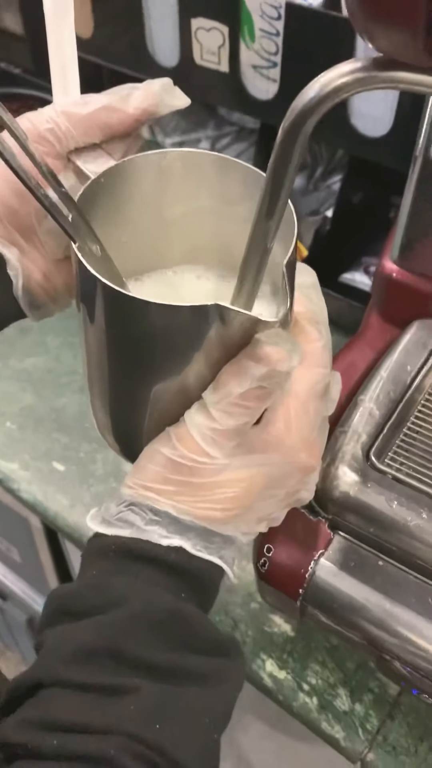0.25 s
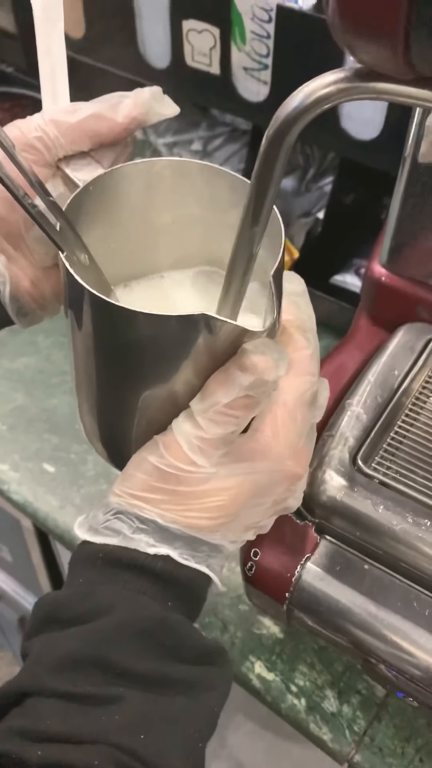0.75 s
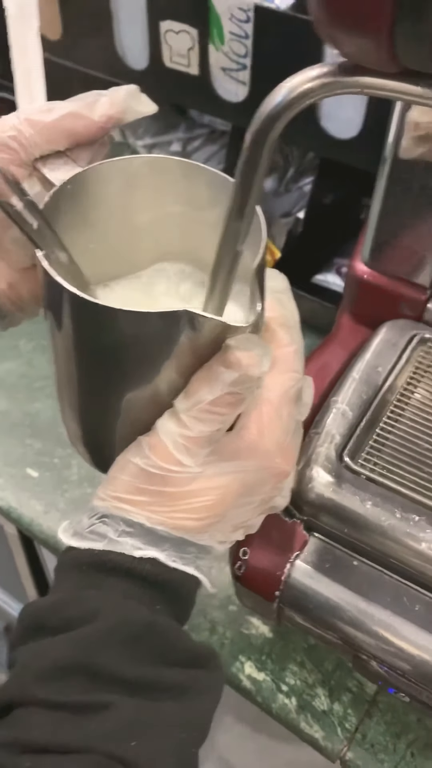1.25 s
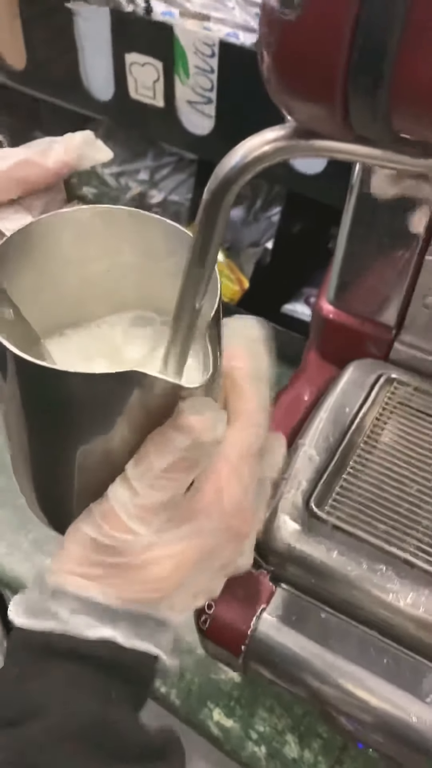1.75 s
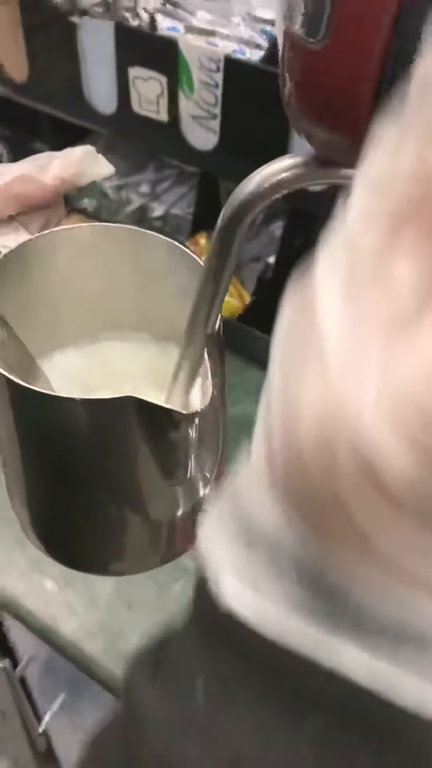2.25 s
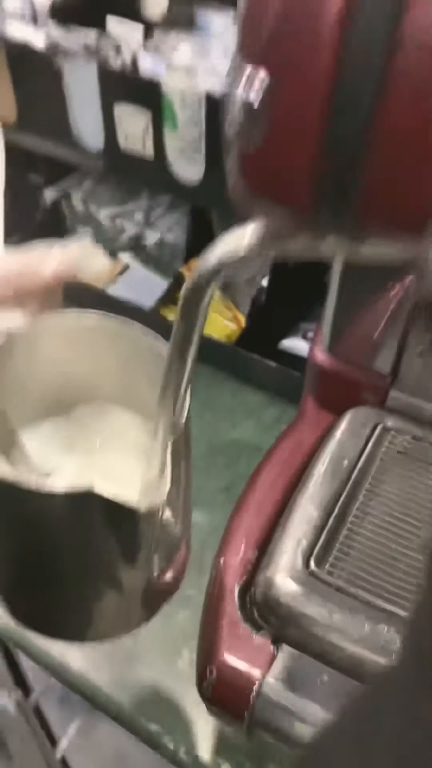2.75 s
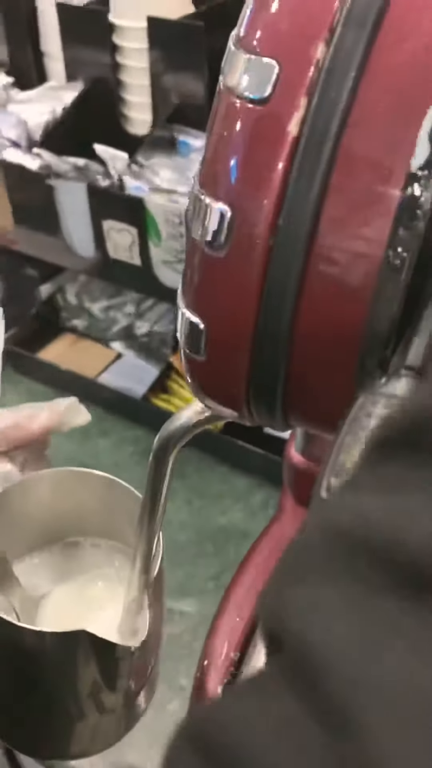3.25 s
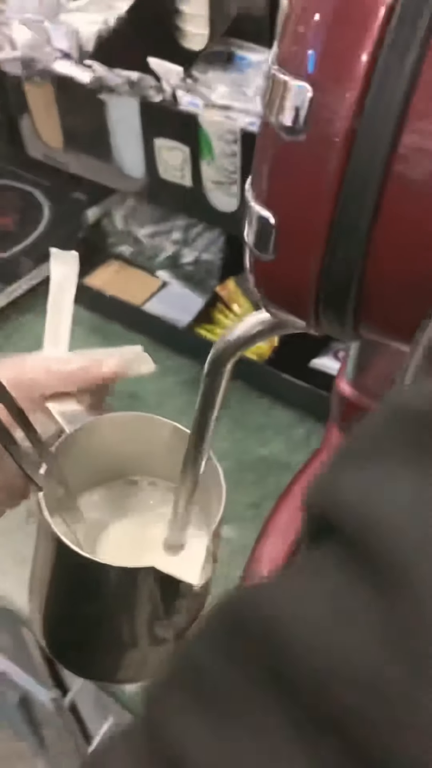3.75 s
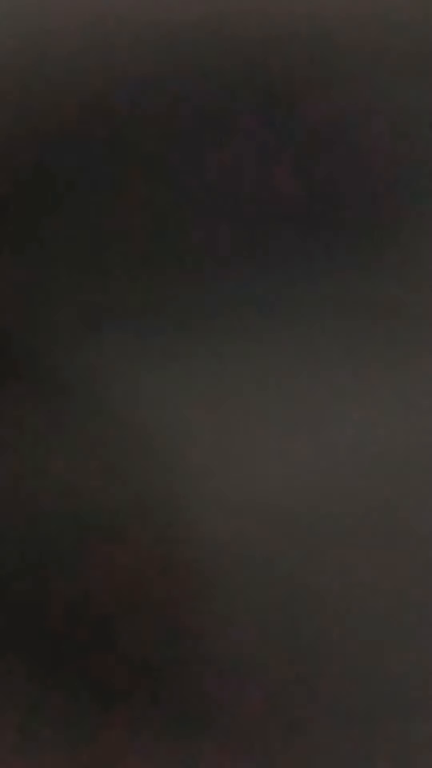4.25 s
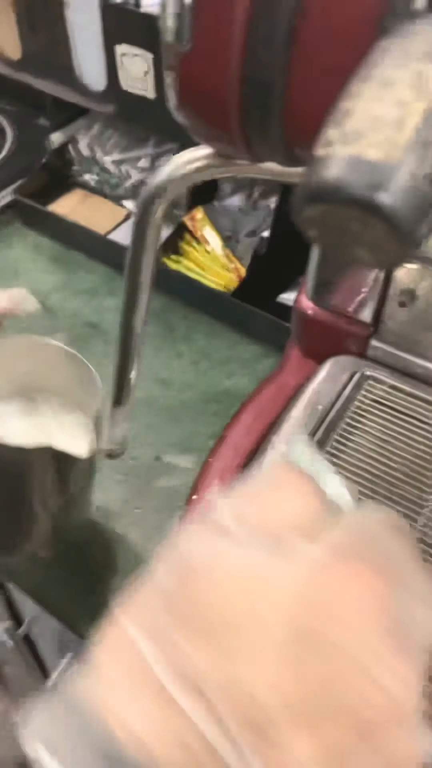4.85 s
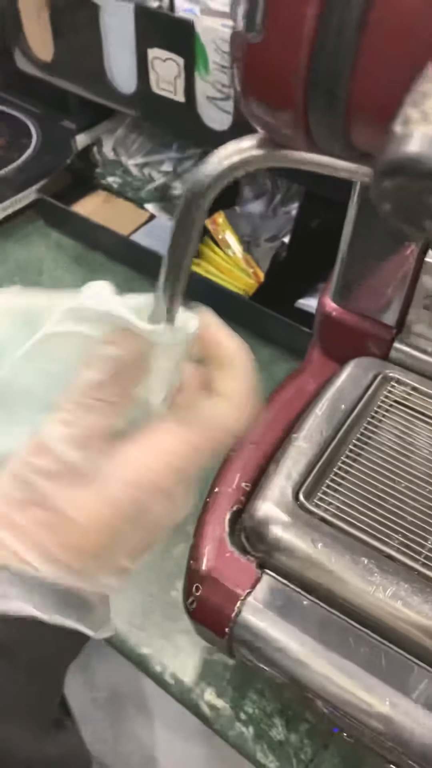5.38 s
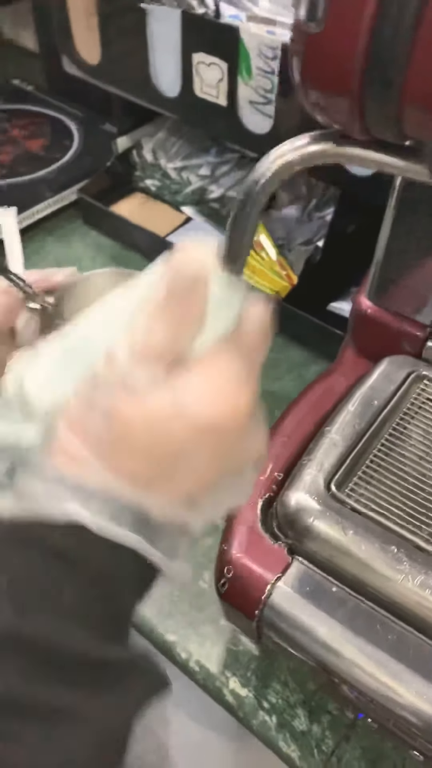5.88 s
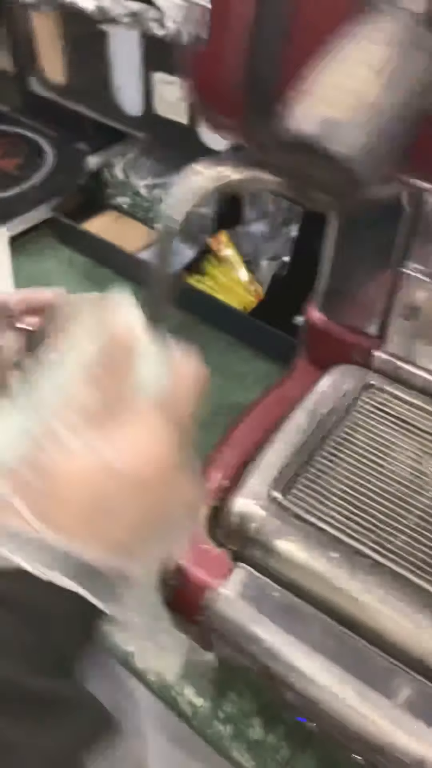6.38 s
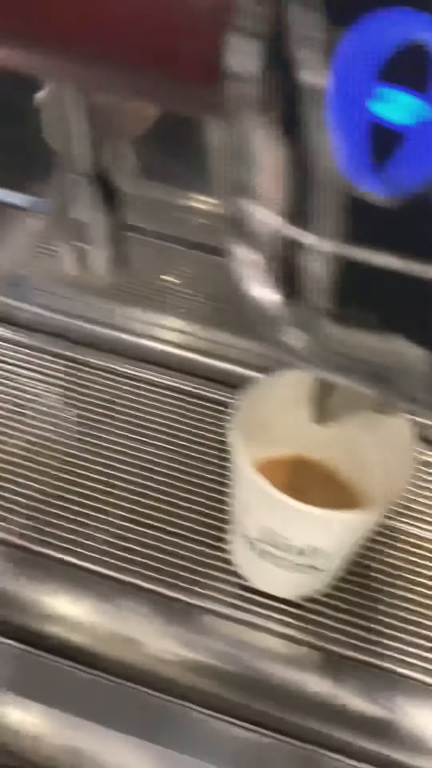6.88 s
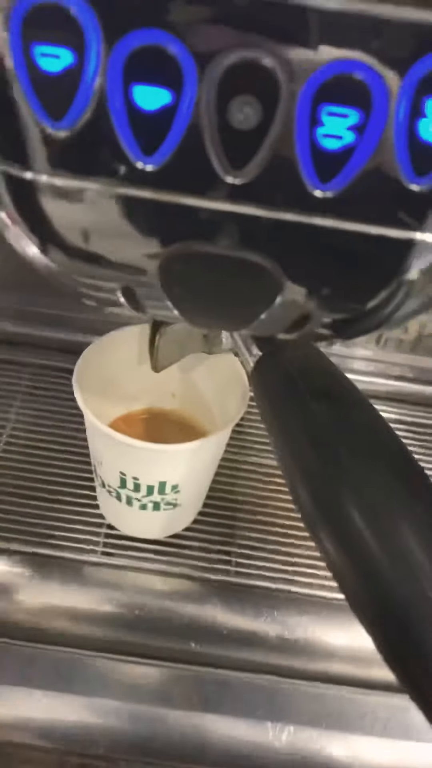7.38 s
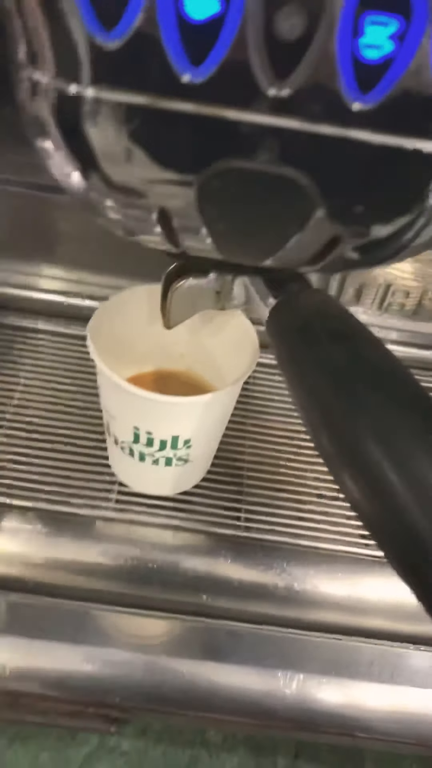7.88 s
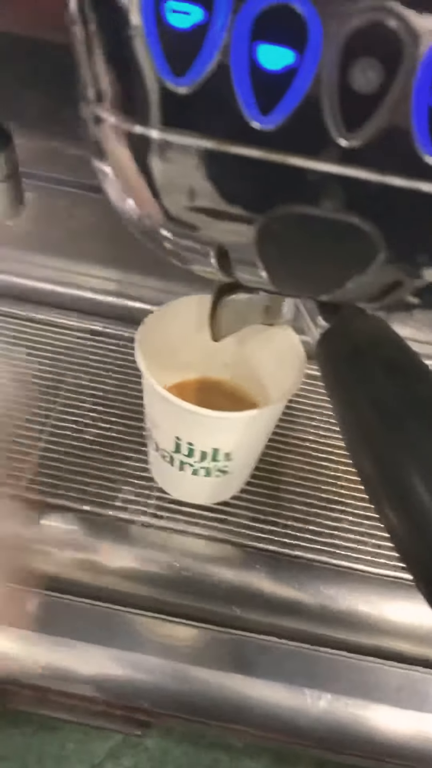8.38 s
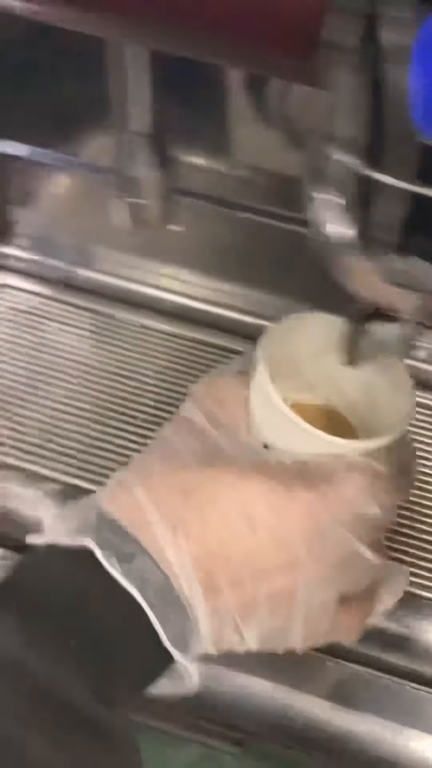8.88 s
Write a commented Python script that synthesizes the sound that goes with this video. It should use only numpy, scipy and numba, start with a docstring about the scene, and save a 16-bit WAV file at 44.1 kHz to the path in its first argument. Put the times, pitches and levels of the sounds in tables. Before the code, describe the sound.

A bubbling milk-steaming roar stops near three seconds; motor whine and fridge hum remain, then firm pitcher knocks, rattles, clacks and a brief steam vent.

```python
"""A steam jet rumbles and hisses in a steel pitcher of milk (damped sines, resonant noise), sputters and is shut off.
The pitcher then knocks on a counter (dispersed decaying modes) while its thermometer rattles (noise bursts).
Cloth rustles now and then in the second half; last come hard clacks and a valve's burst of steam (shaped noise).
Fridges, hum and a loaded motor's whine lie under it all. Two microphone ports hear the sum, and the
gain falls after loud sounds."""
import sys
import numpy as np
from scipy import signal
from scipy.fft import rfft, irfft, next_fast_len
from scipy.io import wavfile
from scipy.ndimage import uniform_filter1d
from numba import njit

SR = 44100
rng = np.random.default_rng(int(sys.argv[2]) if len(sys.argv) > 2 else 0)


def master_out(mix):
    """Clip the mix to full scale and print it as 16-bit PCM to the path in sys.argv[1]."""
    frames = np.transpose(np.atleast_2d(mix))
    ceiling = np.clip(frames, -1, 1)
    pcm = np.round(ceiling * 32767).astype(np.int16)
    wavfile.write(sys.argv[1], SR, pcm)


N = 402633
T = np.arange(N) / SR  # t/s
SIZE = next_fast_len(N + SR // 2)  # padded transform length
F = np.maximum(np.arange(SIZE // 2 + 1) * SR / SIZE, 1.)  # f/Hz

# All levels are relative, ahead of later gains.
# Shop air spectrum: [f/Hz, density level/dB]; its course: [t/s, level/dB]
AIR_SPECTRUM = [(25, -80), (45, -7.5), (70, -5.5), (150, -10.5), (300, -8.5), (600, -12), (1000, -14),
                (1600, -19), (2400, -22.5), (3500, -28.5), (5000, -36.5), (7000, -35), (10000, -39.5),
                (15500, -34.5)]
AIR_LEVEL = [(0, -43), (3, -38.5), (5, -38.5), (6.8, -40.5), (7.5, -40), (9.13, -41.5)]
# Mains hum: [t/s, level/dB]
HUM_LEVEL = [(0, -35), (1.5, -33.5), (2.5, -33), (5, -32.5), (6.5, -35), (7.2, -38), (7.9, -36),
             (9.13, -39.5)]
HUM_HZ = 119.7
# Compressor peaks, applied twice: [f/Hz, width/Hz, level per pass/dB]
COMPRESSOR_PEAKS = [(138.5, 7.2, 0.7), (278.7, 2.1, -3.5), (420, 2, -1.5), (553, 4.5, -1)]
COMPRESSOR_DB = -45.5
# Gear whine: [t/s, second partial level/dB, other partials level/dB]
WHINE_LEVEL = [(0, -50.5, -54), (.4, -48, -58), (.9, -53, -59), (1.3, -53.5, -57), (2.4, -52, -60),
               (2.9, -61.5, -62), (3.5, -56, -56), (4.0, -56, -55), (4.32, -47, -60), (4.8, -56, -53),
               (4.95, -47.5, -54.5), (5.15, -46.5, -63), (5.55, -52, -63), (5.9, -43, -59),
               (6.15, -52, -49), (6.7, -60, -62), (7.0, -47.5, -61.5), (7.5, -41.5, -60.5),
               (8.0, -43, -52.5), (8.6, -49, -60), (9.13, -48, -64)]
# Other partials: [multiple of the fundamental, level/dB, change under load/dB]
PARTIALS = [(1, -16, 0.1), (3, 3.5, -2.5), (4, 1.5, -7)]
# Swell of the second partial, one value a turn: [level/dB]
TURN_SWELLS = [6, 9.9, 19.6, 12.7, 5, 6.3]
# a geared motor meets its load once a turn: it slows, and the second partial swells
WHINE_HZ, TURN_S, LOADED_S, WHINE_FLICKER_DB = 980, 1.605, 1.58, 2.2
LOAD_RISE_S, LOAD_FALL_S, SAG_SHARE = .26, .16, .009
SWELL_EARLY_S, SWELL_LATE_S, SWELL_EDGE_S = 0.19, 0.19, 0.08

# Bright crackling hiss: steam sputters at 1.775 and 2.387 s, then gloves and cloth:
# [middle t/s, length/s, level/dB]
CRACKLE_EVENTS = [(1.775, .1, -41), (2.387, 0.29, -38), (4.745, 0.36, -53.5), (5.103, 0.17, -50),
                  (5.367, 0.32, -43.5), (5.808, 0.28, -42.5), (6.077, 0.21, -51), (6.325, 0.21, -43),
                  (6.64, 0.49, -52), (8.396, 0.89, -48), (9.05, 0.29, -48.5)]
CRACKLE_EDGE_S = 0.041
# Hard clacks: [t/s, level/dB, thud level/dB, casing ring level/dB]
CLACK_EVENTS = [(7.654, -15, -3.5, -26), (8.036, -23, -4, -27)]
# Casing modes: [f/Hz, level/dB, decay by 60 dB/s]
CASING_MODES = [(1080, -4, 0.031), (1320, -2, 0.039), (1770, 4.5, 0.018), (3370, 2, 0.0098),
                (4020, 5, 0.0043)]
THUD_HZ, THUD_CYCLES, THUD_LATE_S, THUD_RING_DB = 195.5, 5.8, 0.01825, -1.5
# The vent opens with a spurt, eases, shuts and leaks away: [t/s, flow level/dB]
VENT_FLOW = [(8.02, -80), (8.034, -28), (8.042, -2.5), (8.063, -4), (8.09, -9), (8.168, -10), (8.188, -16),
             (8.27, -26), (8.3, -36), (8.5, -80)]
# Spectrum of vented steam: [f/Hz, level/dB]
VENT_SPECTRUM = [(300, -26), (1500, -0.5), (3500, 8), (6200, 13), (8000, 7.5), (10500, 13), (13000, 11.5),
                 (14500, 15), (15800, 6.5)]
# Thermometer, lever and glove ticks: [t/s, level/dB]
TICK_EVENTS = [(1.749, -36), (1.784, -33), (1.8043, -33), (2.123, -28), (2.369, -25.5), (2.385, -29),
               (2.412, -25.5), (2.492, -33), (2.53, -28.5), (2.824, -33.5), (5.357, -32), (5.4113, -34),
               (5.458, -35), (5.7613, -18), (5.792, -39), (5.799, -32), (5.8597, -28), (5.9327, -35.5),
               (6.04, -20), (6.058, -23), (6.125, -34.5), (6.327, -19.5), (6.381, -30), (6.3934, -34),
               (6.4295, -39), (6.492, -26), (6.5218, -44), (6.563, -29), (6.593, -36), (6.601, -30),
               (6.671, -34), (6.6888, -36), (7.978, -32.5), (8.022, -28), (8.683, -49)]
# Bright spectrum of ticks, crackles and clacks: [f/Hz, level/dB]
BRIGHT_SPECTRUM = [(800, -4), (2500, 7.5), (4000, 9), (7000, 5.5), (11000, 7), (13500, 4), (15800, 3.5)]
TICK_T60_S, TICK_TAIL_DB, TICK_TAIL_T60_S = 0.018, -11.5, 0.21

# Pitcher on the counter: [t/s, level/dB, hardness/dB, boom/dB, rim crack level/dB]
BLOWS = [(5.284, 1, -2, 3, -21), (5.3031, -20, 7, 2, -16.5), (5.674, 3, -4.5, 4, -16.5),
         (5.983, 0, -6, 0, -16), (6.239, 2, -3, 3.5, -17), (6.473, -4.5, -4, -15, -31),
         (6.606, -16, -26, -1, -53)]
# Counter modes: [f/Hz, level/dB, decay by 60 dB/s]
COUNTER_MODES = [(192.8, -10, 0.53), (330, -25, 0.11), (378.3, 1.5, 0.13), (457, 7, 0.067),
                 (503.6, 4.5, 0.095), (592, -9, 0.23), (790, 8.5, 0.063), (817, -1, 0.14), (936, -12, 0.27),
                 (1334, -7, 0.066), (1425, -4.5, 0.091), (2030, -8, 0.099), (2146, -7, 0.098),
                 (2270, -25, 0.38), (3960, -13, 0.048)]
DETUNE_SHARE, DAMPING_SHARE = .012, .15
# Dull scuffs on the counter: [t/s, level/dB, decay by 60 dB/s]
SCUFF_EVENTS = [(5.132, -28, 0.069), (5.334, -35, 0.054), (6.609, -50, 0.081), (5.14, -27.5, 0.19),
                (5.505, -36, 0.058), (7.981, -36.5, 0.37), (8.198, -26, 0.084), (8.682, -33.5, 0.082),
                (8.93, -37, 0.24)]
# Small rattles of things on the counter: [t/s, level/dB, f/Hz]
RATTLE_EVENTS = [(5.329, -15, 704), (5.409, -39, 714), (5.47, -45, 500), (5.504, -30, 552),
                 (5.719, -14, 823), (5.747, -23, 785), (5.769, -23, 830), (5.793, -21, 752),
                 (5.869, -24, 573), (6.039, -17, 497), (6.057, -16, 754), (6.126, -35, 721),
                 (6.279, -19, 966), (6.329, -24, 990), (6.379, -21, 540), (6.519, -42, 490),
                 (6.559, -42, 794), (8.683, -40, 615)]
RATTLE_CYCLES, RATTLE_OVERTONE, RATTLE_OVERTONE_DB = 7.6, 1.63, -12

# Steam, then valve closing and milk settling: [t/s, rumble level/dB, hiss level/dB, bubble f/Hz]
STEAM_COURSE = [(0, -30.5, -43.5, 582), (1.0, -29.5, -43, 565), (1.7, -31, -42, 546), (1.95, -29, -45, 802),
                (2.1, -30, -41, 590), (2.3, -27.5, -43, 590), (2.4, -22, -51, 404), (2.42, -25.5, -46, 201),
                (2.53, -28, -57, 160), (2.58, -36, -55, 814), (2.66, -43.5, -62, 840),
                (2.91, -41, -72, 770), (3.0, -59, -70, 770)]
STEAM_END_S = STEAM_COURSE[-1][0]
# Pitcher and jet resonances: [f/Hz, width/Hz, level/dB]
PITCHER_PEAKS = [(174, 160, -5), (410, 210, 7.5), (455, 29, 8), (620, 480, -1.5), (790, 35, 0),
                 (790, 280, 6.5)]
JET_PEAKS = [(1280, 420, 25.5), (2190, 270, 25), (3410, 390, 10.5), (6700, 3300, 4), (11460, 5200, 12),
             (14800, 1900, 8)]
# Whistles at the wand tip: [f/Hz, width/Hz, level relative to the hiss/dB]
TIP_WHISTLES = [(7410, 170, -17.5), (11000, 100, -17.5)]
WHISTLE_WAVER_DB = 4
# Gulps of air, big bubbles above the churn: [t/s, swell/dB, spit/dB, pitch shift/octave, fade/s]
GULP_EVENTS = [(.5, 3, -0.5, -0.086, 0.033), (.93, 2.5, 0, 0.063, 0.053), (1.76, 9, 3, -0.38, 0.028),
               (1.97, 2.5, 4, 0.21, 0.066), (2.319, 7, -4.5, -0.082, 0.049), (2.432, 5.5, 4, -0.15, 0.062),
               (2.6, 6, 6, 0.002, 0.089)]
GULP_RISE_S, GULP_CHURN_DB, GULP_NARROWING = 0.021, -4, 0.52
BUBBLE_SPREAD_OCT, SURGE_DB, SURGES_PER_S = 1.104, 1.5, 18
# The biggest bubbles, each a pop of its own: [t/s, level/dB, f/Hz]
POP_EVENTS = [(0.338, -22, 590), (0.686, -19, 487), (0.743, -17, 487), (0.855, -18, 700), (0.919, -21, 520),
              (1.024, -18, 666), (1.129, -18, 549), (1.221, -23, 634), (1.442, -25, 620), (1.68, -20, 622),
              (1.76, -25, 460), (1.791, -24, 590), (2.09, -22, 604), (2.22, -19.5, 592), (1.737, -24, 228),
              (1.752, -21.5, 335), (2.321, -12, 583), (2.348, -12, 430), (2.382, -15, 402),
              (2.417, -20.5, 175), (2.444, -23, 185), (2.459, -26, 169), (2.525, -24, 160)]
POP_CYCLES = 2.9
# small bubbles torn off in bunches; FIZZ_DB is against the hiss
FIZZ_HZ, FIZZ_SPREAD_OCT, FIZZ_DB, FIZZ_BUNCH_DB = 1568, 1.25, 0, 2.5
# Slow roll of the milk: [t/s, level/dB]
ROLL_LEVEL = [(0, -65), (.9, -50), (1.3, -40), (1.9, -48), (2.3, -37), (2.45, -39), (2.55, -37),
              (2.65, -45)]
ROLL_HZ, ROLL_WIDTH_HZ = 176, 130

# Ports below the treble, by direction: [f/Hz, left's phase lead/rad, left minus right level/dB]
SHOP_PORTS = [(272, 0.5, -0.5), (565, -1.5, 3), (1200, -2, 0), (1820, -1, -0.5), (2090, 3, 7.5),
              (2540, 3.5, -2.5), (3160, -4, 3)]
COUNTER_PORTS = [(297, 0, 1.5), (516, 0.76, 2), (825, 1.2, 8.5), (987, -0.5, -2), (1640, 1.5, 1),
                 (2250, -1.8, -5.5), (2515, 3, 5), (3200, 1.55, -2)]
WAND_PORTS = [(264, -1, -8), (440, -0.24, 3), (623, -0.63, 12), (740, -1.15, 2), (1210, -1.8, -2.5),
              (1610, -1.66, -4), (2030, 1.57, -7.5), (2920, 1.5, -2.5)]
# Weight of the sound that differs at the ports: [f/Hz, share]
PORT_DIFFERENCE = [(150, 0.69), (400, 0.26), (650, 1.68), (2500, 0.7), (3500, 2.1), (4500, 0.011),
                   (15000, 0.034)]
PORT_LAG_S, PORT_TURN_RAD = 10.4 / 44100, 3.8
TOP_HZ = 15800


def undb(db):
    """Amplitude gain is the antilogarithm of level/20."""
    return 10 ** (np.asarray(db) / 20)


def unit(x):
    """Normalisation to unit root-mean-square."""
    return x / np.sqrt(np.mean(x ** 2))


def samples(s):
    """Sampling: times in s become sample indices."""
    return (s * SR).astype(np.int64)


def curve(table):
    """Linear interpolation of a time table's columns at every sample."""
    s, *columns = np.transpose(table)
    return [np.interp(T, s, c) for c in columns]


def over_hz(table, column=1):
    """Interpolation of a column on a logarithmic frequency axis."""
    rows = np.array(table, float)
    return np.interp(np.log(F), np.log(rows[:, 0]), rows[:, column])


def shape(x, response):
    """Linear filtering: spectrum times frequency response."""
    return irfft(rfft(x, SIZE) * response, SIZE)[..., :N]


def noise(response, flicker_db=0.):
    """Filtered Gaussian noise of unit rms, its level modulated before the filter."""
    return unit(shape(undb(flicker_db) * rng.standard_normal(N), response))


def resonances(table):
    """Superposition of two-pole resonances."""
    return sum(undb(db) / (1 + 1j * (F - hz * hz / F) / width) for hz, width, db in table)


def ringing(modes, f):
    """Frequency responses of exponentially decaying modes, one row a mode."""
    hz, db, t60 = np.transpose(modes)[:, :, None]
    damped_f = f - 1j * np.log(1000) / (2 * np.pi * t60)
    return undb(db) * SR * hz / (hz * hz - damped_f ** 2) / (2 * np.pi)


def walk(rate):
    """Random modulation: levels held 1 / rate s, then averaged twice."""
    k = int(SR / rate)
    held = np.repeat(rng.standard_normal(N // k + 1), k)
    return 1.5 * uniform_filter1d(uniform_filter1d(held, k), k)[:N]


def bursts(times, gains, t60s):
    """Impulsive excitation: sudden onsets with exponential decay."""
    out = np.zeros(N)
    for s, g, t60 in zip(times, gains, t60s):
        i = int(s * SR)
        tail = out[i:i + int(1.2 * t60 * SR)]
        tail += g * undb(-60 * np.arange(len(tail)) / SR / t60)
    return out


def swells(times, rise_s, fade_s):
    """Gaussian rise to 1 at each time and Gaussian fall after, one row an event."""
    late = T - np.reshape(times, (-1, 1))
    return np.exp(-(late / np.where(late < 0, rise_s, np.reshape(fade_s, (-1, 1)))) ** 2)


@njit
def grains(n, start, hz, cycles, size, glide):
    """Damped oscillators whose frequency rises by the share glide as they decay."""
    out = np.zeros(n)
    for k in range(len(start)):
        step = 2 * np.pi * hz[k] / SR
        decay = np.exp(-hz[k] / cycles[k] / SR)
        phase, a = 0., size[k]
        length = int(5 * cycles[k] / hz[k] * SR)
        for i in range(start[k], min(n, start[k] + length)):
            out[i] += a * np.sin(phase)
            phase += step * (1 + glide * (i - start[k]) / length)
            a *= decay
    return out


@njit
def follower(x, attack, release):
    """First-order smoothing with unequal rise and fall."""
    out, e = np.empty(len(x)), 0.
    for i in range(len(x)):
        e += (x[i] - e) * (attack if x[i] > e else release)
        out[i] = e
    return out


def ports(x, table, other, diffuse):
    """Phase and level differences between ports: small in the bass, a lag and phase turn in the treble."""
    spaced = np.clip(F / 200 - 1, 0, 1)
    treble = F > table[-1][0]
    lead = np.where(treble, 2 * np.pi * F * PORT_LAG_S - PORT_TURN_RAD, over_hz(table))
    level_db = spaced * (F < table[-1][0]) * over_hz(table, column=2)
    tilt = undb(level_db / 2) * np.exp(.5j * spaced * lead)
    # other enters the two ports with opposite sign
    apart = np.clip(diffuse * over_hz(PORT_DIFFERENCE), 0, 3) * (spaced + 0.17)
    common, differing = rfft(x, SIZE), apart * rfft(other, SIZE)
    pair = np.array([(common + differing) * tilt, (common - differing) / tilt])
    return irfft(pair / np.sqrt(1 + apart ** 2), SIZE)[:, :N]


def shop():
    """Broadband noise of fans and fridges: octave bands flicker independently; two unrelated versions."""
    out = 0
    spectrum = rfft(rng.standard_normal((2, SIZE))) * undb(over_hz(AIR_SPECTRUM))
    for hz in 30 * 2. ** np.arange(10):
        band = np.cos(np.pi / 2 * np.clip(np.log2(F / hz), -1, 1)) ** 2
        out = out + undb(1.1 * walk(9)) * irfft(spectrum * band, SIZE)[:, :N]
    return unit(out) * undb(curve(AIR_LEVEL)[0])


def hum():
    """A sinusoid at twice the line rate, wavering in level and phase."""
    return undb(curve(HUM_LEVEL)[0] + .5 * walk(6.4)) * np.sin(2 * np.pi * HUM_HZ * T + 0.055 * walk(4.2))


def compressor():
    """Narrow-band noise: a drone whose lowest peak lies above the hum."""
    return undb(COMPRESSOR_DB) * noise(resonances(COMPRESSOR_PEAKS) ** 2)


def gear_whine():
    """Harmonics of a rotation that slows under load, the partials changing level."""
    db, other_db = curve(WHINE_LEVEL)
    loaded_s = LOADED_S + TURN_S * np.arange(-1, 5)
    load = swells(loaded_s, LOAD_RISE_S, LOAD_FALL_S).max(0)
    # the swell holds even from before the heaviest load until after it
    late = T - loaded_s[:, None]
    inside = np.minimum(late + SWELL_EARLY_S, SWELL_LATE_S - late)
    held = np.clip(inside / SWELL_EDGE_S + .5, 0, 1)
    speed = 1 - SAG_SHARE * load + 0.000598 * walk(6)
    turn = 2 * np.pi * np.cumsum(WHINE_HZ * speed) / SR
    second_db = db + np.array(TURN_SWELLS) @ held + WHINE_FLICKER_DB * walk(7.0)
    out = undb(second_db) * np.sin(2 * turn)
    for k, rel_db, load_db in PARTIALS:
        out += undb(other_db + rel_db + load_db * load + 2.0 * walk(19)) * np.sin(k * turn)
    return out


def crackles():
    """Amplitude-modulated noise: dense tiny crackles of sputtering steam, then of thin plastic and damp cloth."""
    moving = 0
    for s, length, db in CRACKLE_EVENTS:
        outside = np.maximum(abs(T - s) - length / 2 + CRACKLE_EDGE_S, 0)
        moving = moving + undb(db) * np.exp(-outside / CRACKLE_EDGE_S)
    return moving * noise(undb(over_hz(BRIGHT_SPECTRUM)), 2.6 * walk(300))


def vent():
    """Turbulent flow noise: the valve's flow sets the level of bright steam."""
    return undb(curve(VENT_FLOW)[0]) * noise(undb(over_hz(VENT_SPECTRUM)), 1.4 * walk(150))


def clacks():
    """Impact excitation: noise bursts ring the casing's modes and a thud follows."""
    s, db, thud_db, ring_db = np.transpose(CLACK_EVENTS)
    envelope = bursts(s, undb(db), s * 0 + 0.045) + bursts(s, undb(db - 1.5), s * 0 + 0.17)
    crack = envelope * rng.standard_normal(N)
    thud = bursts(s + 0.014, undb(db + thud_db), s * 0 + 0.25)
    thud *= noise(resonances([(212, 69, 9.0), (890, 780, -3.5)]))
    boom_gain = undb(db + thud_db + THUD_RING_DB)
    thud += grains(N, samples(s + THUD_LATE_S), s * 0 + THUD_HZ, s * 0 + THUD_CYCLES, boom_gain, 0.)
    casing = shape(crack * undb(np.interp(T, s, ring_db)), ringing(CASING_MODES, F).sum(0))
    return undb(-6.0) * shape(crack, undb(over_hz(BRIGHT_SPECTRUM))) + casing + thud


def ticks():
    """Two-stage decay: short bright cracks with a fainter, longer rustle; every knock brings one."""
    s, db = np.transpose(TICK_EVENTS + [(row[0], row[-1]) for row in BLOWS])
    envelope = bursts(s, undb(db), s * 0 + TICK_T60_S)
    envelope += bursts(s, undb(db + TICK_TAIL_DB), s * 0 + TICK_TAIL_T60_S)
    return envelope * noise(undb(over_hz(BRIGHT_SPECTRUM)))


def counter_blows():
    """Dispersion of bending waves: treble arrives first, bass late, and the struck modes ring."""
    s, db, hard_db, boom_db, _ = np.transpose(BLOWS)
    f = F[F < 6500]
    blows = undb(db)[:, None] * np.exp(-2j * np.pi * f * s[:, None])
    spread = np.exp(-2j * np.pi * 2 * .005 * np.sqrt(500 * f)) * np.exp(2j * np.pi * f * 0.00104)
    # each blow lands elsewhere and shares itself differently; hard blows reach the high modes
    mode_hz = np.array(COUNTER_MODES)[:, :1]
    place_db = 2.2 * rng.standard_normal((len(s), len(COUNTER_MODES))).T
    share = undb(place_db + (mode_hz > 1000) * (hard_db + 2.5) + (mode_hz < 350) * boom_db - 12)
    # the grip and the load shift and damp every mode a little, anew at each blow
    scatter = rng.standard_normal((len(s), len(COUNTER_MODES), 3))
    bends = np.exp(np.array([DETUNE_SHARE, 0, DAMPING_SHARE]) * scatter)
    thump = resonances([(453, 890, 22.6), (1290, 1800, 12.0)])[:len(f)] / (1 + (f / 2500) ** 4)
    rung = thump * blows.sum(0)
    for blow, part, bend in zip(blows, share.T, bends):
        rung = rung + blow * (part @ ringing(COUNTER_MODES * bend, f))
    return irfft(spread * rung / (1 + (130 / f) ** 4), SIZE)[:N]


def counter_rattle():
    """Decaying noise of rim, shelves and scuffs; two unrelated versions."""
    s, db = np.transpose(BLOWS)[:2]
    # the rim brushes the counter just before the blow
    tail = bursts(s - .009, undb(db - 28.0), s * 0 + 0.23)
    tail += bursts(s + 0.0092, undb(db - 15.0), s * 0 + 0.19)
    tail += bursts(s + 0.03, undb(db - 32.5), s * 0 + 0.82)
    scuff_s, scuff_db, scuff_t60 = np.transpose(SCUFF_EVENTS)
    tail += bursts(scuff_s, undb(scuff_db), scuff_t60)
    response = resonances([(300, 290, 37), (1100, 500, 9), (2050, 400, -6)]) / (1 + (F / 3000) ** 4)
    return unit(shape(rng.standard_normal((2, N)), response)) * tail * undb(3.2 * walk(90))


def small_rattles():
    """Damped free vibration: each small object sounds a tone and one inharmonic overtone."""
    s, db, hz = np.transpose(RATTLE_EVENTS)
    out = 0
    for k, rel_db in [(1, 0), (RATTLE_OVERTONE, RATTLE_OVERTONE_DB)]:
        out = out + grains(N, samples(s), k * hz, k * RATTLE_CYCLES + 0 * hz, undb(db + rel_db), 0.)
    return out


def jet():
    """Turbulent jet noise through resonances, with narrow-band whistles at the wand tip."""
    out = noise(resonances(JET_PEAKS), 2.1 * walk(61.33) + 1.2 * walk(7.15))
    for hz, width, db in TIP_WHISTLES:
        out += undb(db + WHISTLE_WAVER_DB * walk(8.9)) * noise(resonances([(hz, width, 0)]) ** 2)
    return out


def pops():
    """Bubble resonance: the biggest bubbles ring singly, rising in pitch."""
    s, db, hz = np.transpose(POP_EVENTS)
    return grains(N, samples(s), hz, s * 0 + POP_CYCLES, undb(db), 0.18)


def steam(count=3600):
    """Bubble resonance and pitcher-filtered churn make the rumble; fizz and jet make the hiss."""
    rumble_db, hiss_db, pitch = curve(STEAM_COURSE)
    s, swell_db, spit_db, octaves, fade_s = np.transpose(GULP_EVENTS)
    gulp = swells(s, GULP_RISE_S, fade_s)
    any_gulp = gulp.max(0)
    rumble_db = rumble_db + swell_db @ gulp + SURGE_DB * walk(SURGES_PER_S)
    on = np.clip((STEAM_END_S - T) / 0.12, 0, 1)
    live = slice(0, 3 * SR)

    chance = rng.random((count, 4)).T
    start = samples(chance[0] * STEAM_END_S)
    spread = BUBBLE_SPREAD_OCT * (1 - GULP_NARROWING * any_gulp)
    hz = (pitch * 2 ** (octaves @ gulp))[start] * 2 ** (spread[start] * (chance[1] - .5))
    size = undb(np.minimum(-3.0 * np.log(chance[3] + 1e-4), 8)) * np.sqrt(hz)
    bubbles = grains(N, start, hz, 1.5 + 5.9 * chance[2], size, 0.11)

    churn = undb(2.2 * walk(50)) * rng.standard_normal(N)
    pitcher = unit(shape(churn, resonances(PITCHER_PEAKS) / (1 + (F / 1200) ** 4)))
    body = bubbles / bubbles[live].std() + undb(GULP_CHURN_DB * any_gulp + 1.0) * pitcher
    body = shape(body, 1 / (1 + (90 / F) ** 4))
    roll = unit(shape(churn, resonances([(ROLL_HZ, ROLL_WIDTH_HZ, 0)]) ** 2))
    roll = undb(curve(ROLL_LEVEL)[0] + 0.78 * walk(26.2)) * roll

    fizz_hz = FIZZ_HZ * 2 ** (FIZZ_SPREAD_OCT * (chance[2] - .5) + 0.248 * walk(12)[start])
    bunch = undb(FIZZ_BUNCH_DB * (walk(45.57) + walk(9.14))[start])
    fizz_size = size * bunch * (FIZZ_HZ / fizz_hz) ** 0.82
    fizz = grains(N, start, fizz_hz, 2.0 + 4 * chance[1], fizz_size, 0.17)

    rumble = undb(rumble_db) * body / body[live].std()
    hiss = undb(hiss_db + spit_db @ gulp) * jet() + undb(hiss_db + FIZZ_DB) * fizz / fizz[live].std()
    return pops() + on * (roll + rumble + hiss)


def scene():
    """Superposition of all sources at the two ports."""
    air, other_air = shop()
    motors = gear_whine() + compressor() + hum()
    bright = ticks() + crackles() + clacks() + vent()
    rattle, other_rattle = counter_rattle()
    near = counter_blows() + small_rattles() + rattle + bright
    wand = steam()
    # an unrelated rattle noise and delayed copies of bright and wand sounds make the ports differ
    near_difference = other_rattle + 0.51 * np.roll(bright, 300)
    wand_difference = np.roll(wand, 1900)
    return (ports(air + motors, SHOP_PORTS, other_air, 0.6)
            + ports(near, COUNTER_PORTS, near_difference, 0.34)
            + ports(wand, WAND_PORTS, wand_difference, 0.17))


def record(dry):
    """Compression keyed mostly by the left port's treble, soft saturation of peaks, a steep top cut."""
    heard = shape(dry[0], 0.4 + F / 8000) ** 2
    level = np.sqrt(follower(heard, 1 / (0.078 * SR), 1 / (.09 * SR)))
    gain = np.maximum(level / undb(-22.0), 1) ** -.7
    top_cut = signal.ellip(10, .2, 80, TOP_HZ, fs=SR, output="sos")
    return signal.sosfilt(top_cut, np.tanh(0.86 * dry * gain) / 0.95)


dry = scene()
out = record(dry)
master_out(out)
```